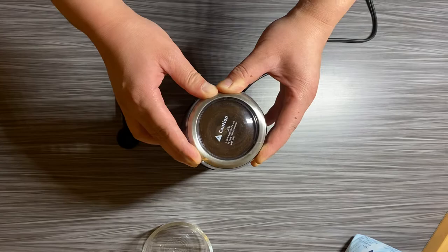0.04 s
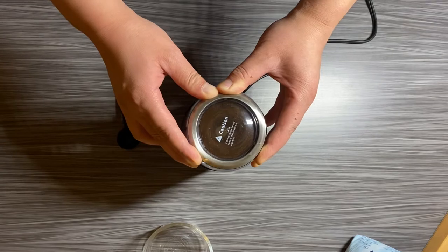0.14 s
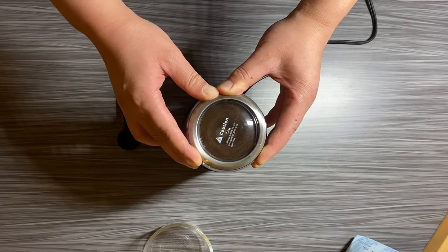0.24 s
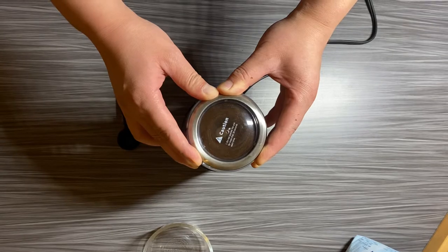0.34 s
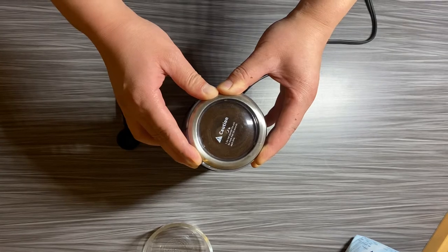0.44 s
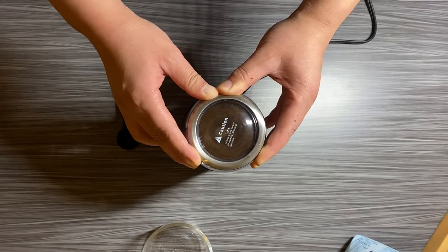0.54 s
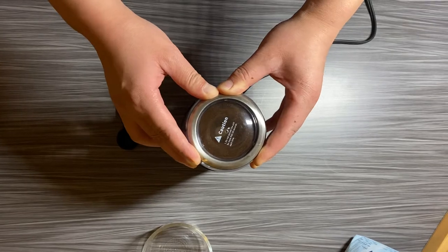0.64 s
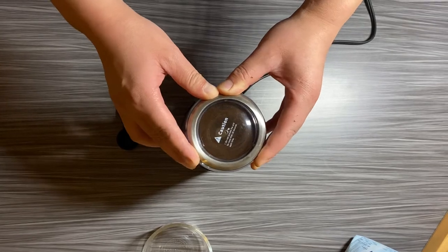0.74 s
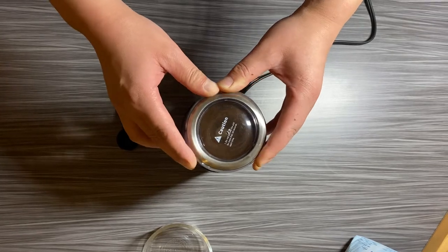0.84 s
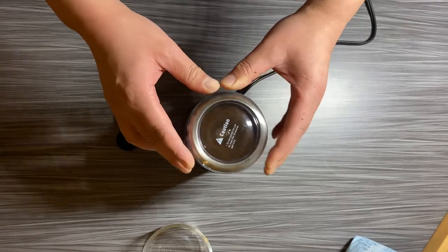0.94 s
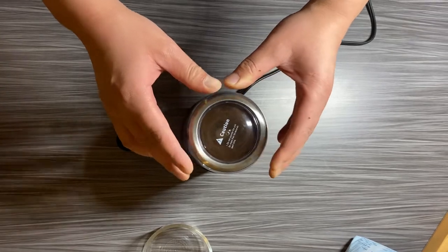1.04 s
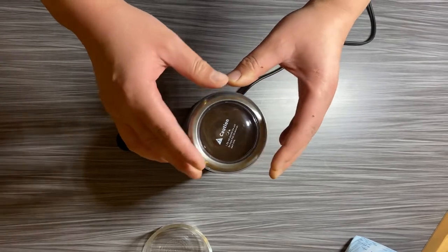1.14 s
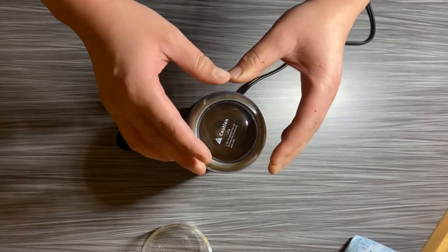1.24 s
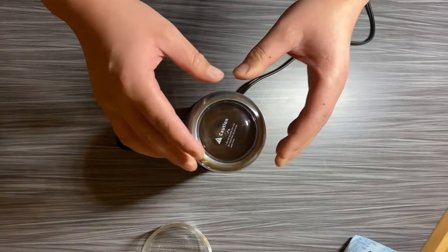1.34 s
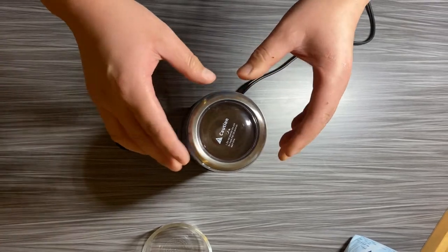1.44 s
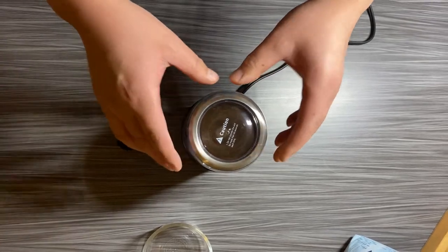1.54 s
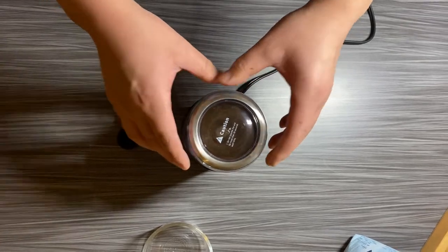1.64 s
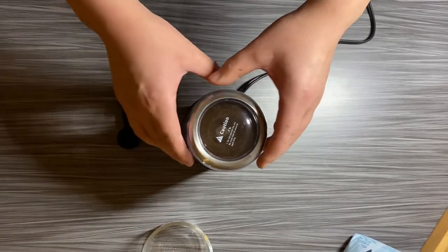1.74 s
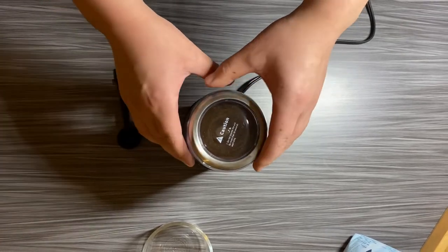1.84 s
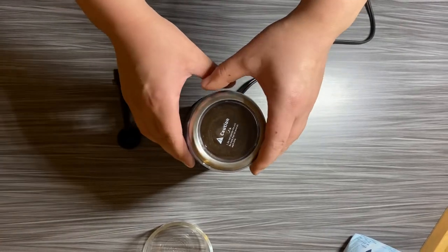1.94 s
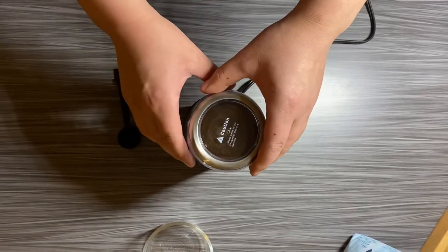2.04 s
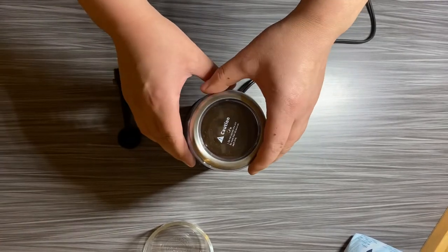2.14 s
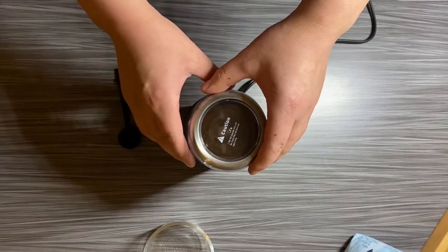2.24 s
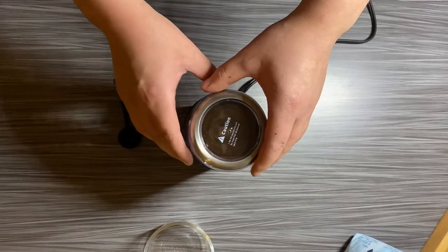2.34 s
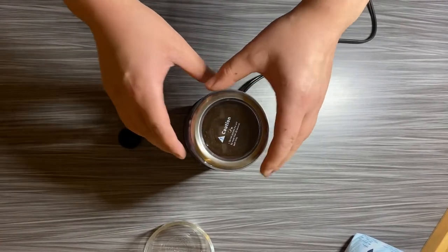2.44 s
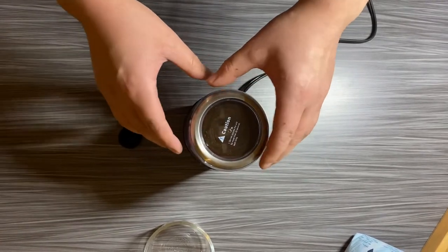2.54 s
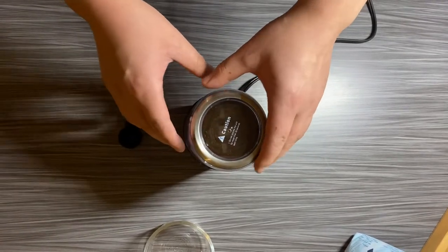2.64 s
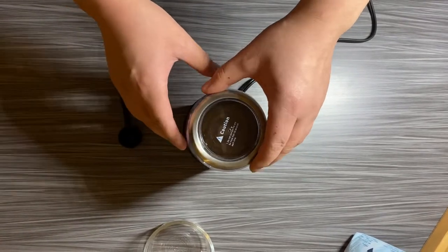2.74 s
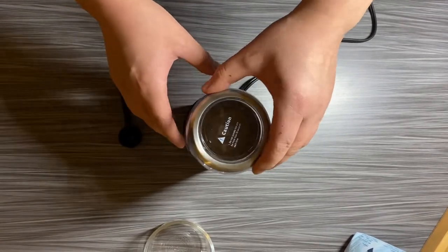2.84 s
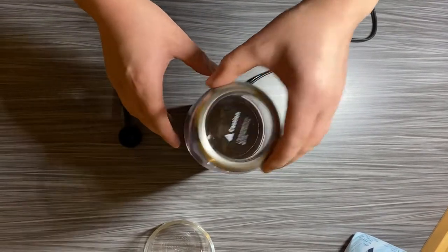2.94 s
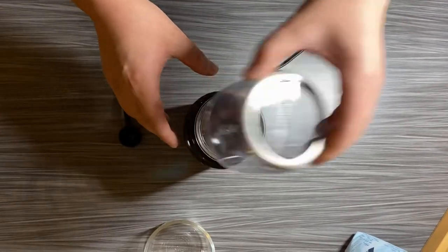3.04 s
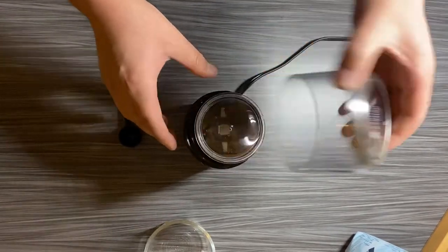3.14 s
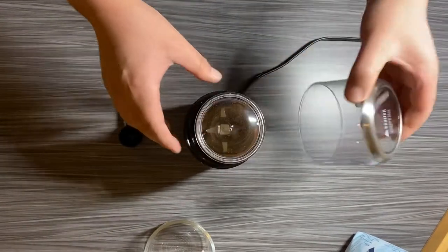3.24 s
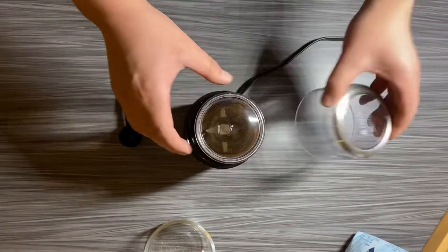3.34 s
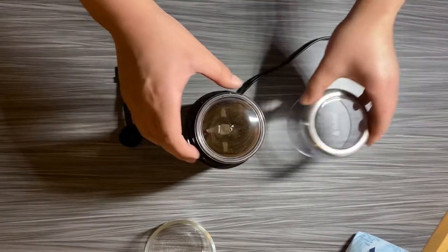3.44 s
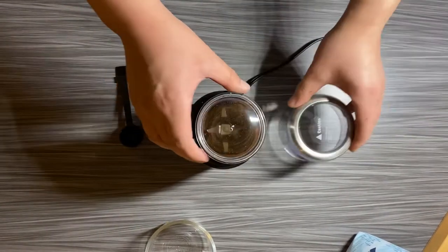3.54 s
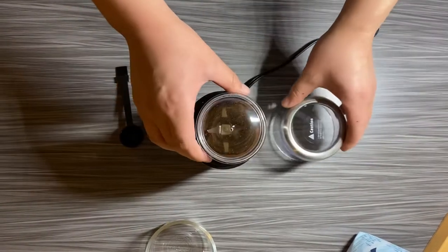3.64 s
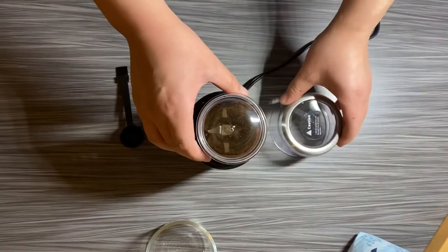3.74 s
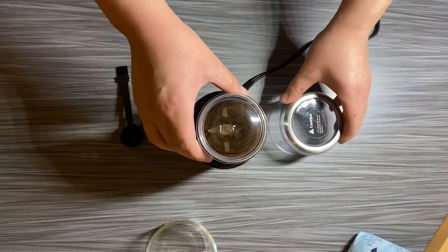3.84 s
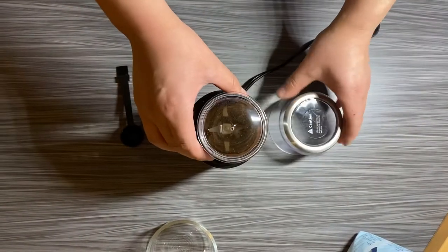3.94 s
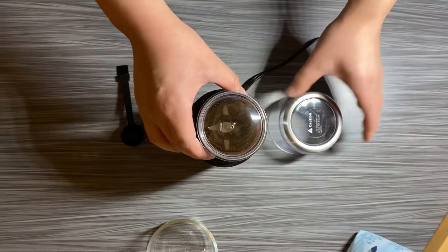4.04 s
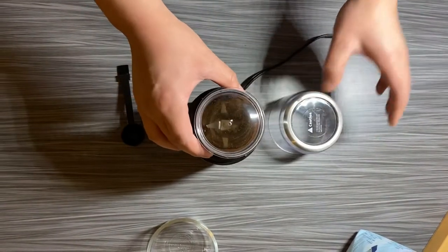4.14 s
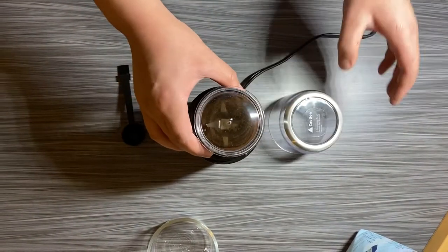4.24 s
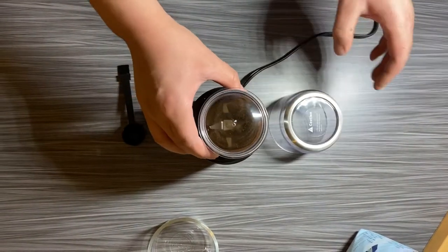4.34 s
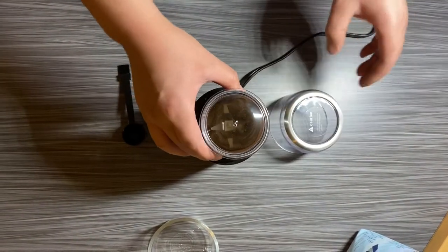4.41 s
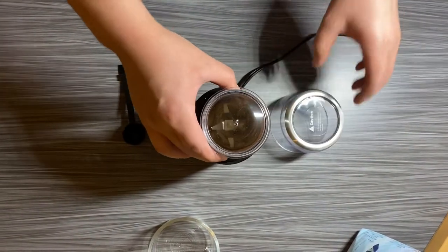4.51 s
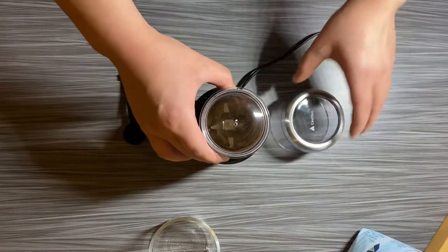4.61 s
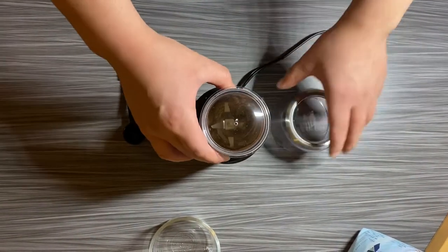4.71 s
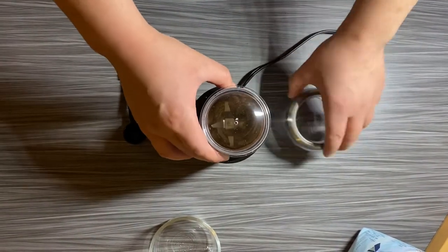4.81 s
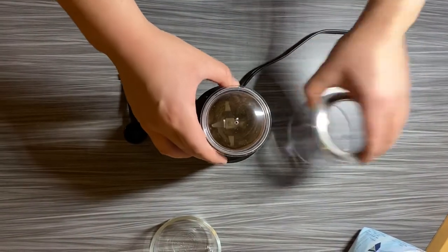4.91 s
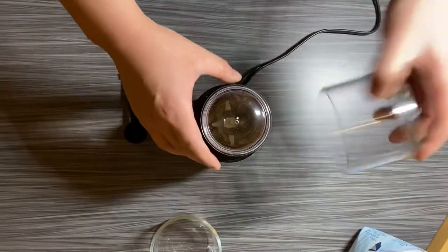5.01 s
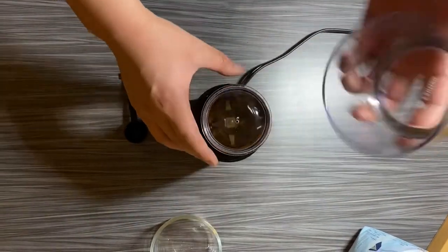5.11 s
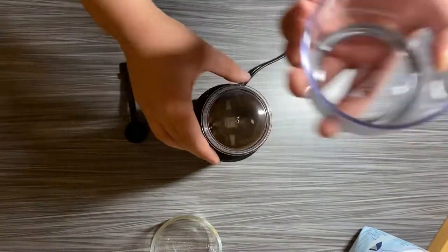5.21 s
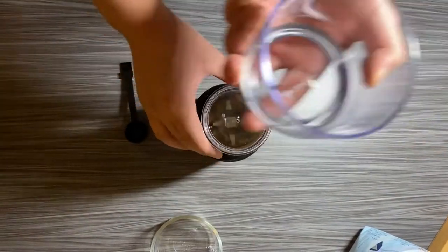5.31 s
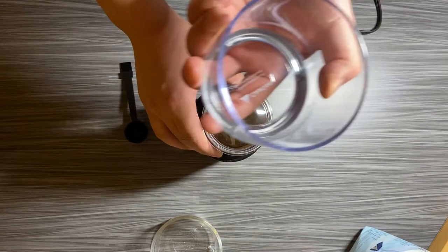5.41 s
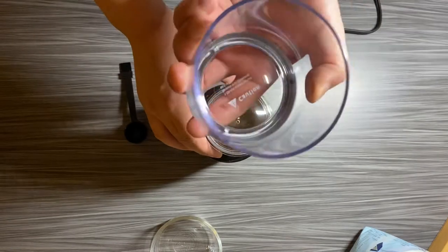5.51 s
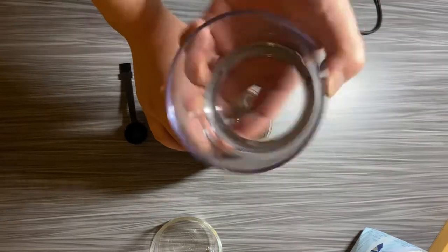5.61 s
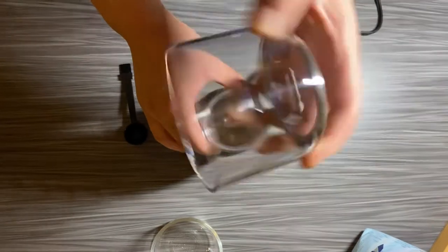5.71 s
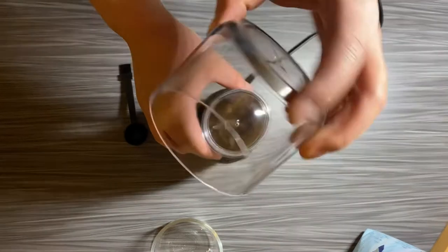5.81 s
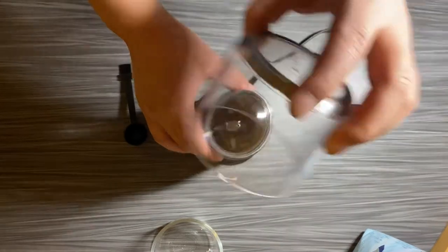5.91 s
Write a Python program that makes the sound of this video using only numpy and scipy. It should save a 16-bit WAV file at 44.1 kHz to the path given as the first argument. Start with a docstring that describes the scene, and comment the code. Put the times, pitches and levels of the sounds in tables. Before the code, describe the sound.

In a small room with a short echo, closely heard in stereo, a blade coffee grinder is already running: a steady nasal whine at about 420 Hz with overtones, a wavering airy howl and churning grounds. At about 0.6 s it is let go; the powered whine and churn cut away quickly and the pitch glides down, while grounds rattle and hiss against the cup in slowing, increasingly separate sweeps until about 2 s. Light ticks follow at 2.0, 2.2 and 2.3 s, then a tight cluster of clicks with a brief scuff at 2.65-2.75 s as the plastic lid comes off. At 3.72 s it lands on the wooden table with the loudest, hollow knock, stronger at right, chattering briefly until 3.8 s, with a small scrape near 3.9 s. Soft finger thuds come at 4.4 and 4.6 s, a thud and juddering slide at 4.78 s, and a faint bump at 5.36 s. Low rumble and faint hiss remain.

```python
"""In a small room, a blade coffee grinder whines on a wooden table, is let go and coasts to a stop.
Its shaft tones follow the speed; grounds excite the resonances of cup and blade as filtered noise.
The plastic lid is pulled off, knocked down on the table and picked up again: blows set decaying modes going.
The room's reflections differ between left and right, over a low rumble and faint hiss."""
import sys
import numpy as np
from scipy import signal
from scipy.fft import rfft, irfft
from scipy.io import wavfile

SR = 44100
rng = np.random.default_rng(int(sys.argv[2]) if len(sys.argv) > 2 else 0)


def master_out(mix):
    """Clip the mix to full scale and print it as 16-bit PCM to the path in sys.argv[1]."""
    frames = np.transpose(np.atleast_2d(mix))
    ceiling = np.clip(frames, -1, 1)
    pcm = np.round(ceiling * 32767).astype(np.int16)
    wavfile.write(sys.argv[1], SR, pcm)


N = 263277
TIME, BINS = np.arange(N) / SR, np.fft.rfftfreq(N, 1 / SR)  # s, Hz

# Spectrum of hard contact ticks. Each row: frequency in Hz, relative level in dB per Hz.
TICK_SPECTRUM = [(200, -5.5), (1000, 8), (2700, -0.5), (4500, 2.5), (5500, -5), (7000, 2), (9000, -8.5),
                 (14500, -18.5)]
# Spectrum of clattering and juddering plastic. Each row: frequency in Hz, relative level in dB per Hz.
CLATTER_SPECTRUM = [(90, -25), (200, -5.5), (420, -8), (820, -0.5), (1100, -5), (1420, -3.5), (2400, -16),
                    (3000, -25), (8000, -43.5)]

RELEASE_S = 0.5877  # the lid is let up and the power goes
RUN_HZ, COAST_S = 421.6, .69  # steady shaft speed, and the moment in s at which it starts to coast
LOAD_S, LOAD_HALF_S = .595, .06  # packed grounds load the blade once: middle and half length
CHURN_FADE_DB_PER_S = 228.5  # shared by the sounds of grounds and air under power


def amp(db):
    """Decibels to gain: 20 dB is a factor of ten in amplitude."""
    return 10 ** (np.asarray(db) / 20)


def unit(x):
    """Normalization: scales to rms 1."""
    return x / np.sqrt(np.mean(x ** 2) + 1e-20)


def read(points, hz):
    """Linear interpolation of a spectrum table on a log-frequency axis."""
    f, value = np.transpose(points)
    return np.interp(np.log(hz + 1), np.log(f + 1), value)


def colour(x, points):
    """Minimum-phase filtering: the ringing follows its cause, and white noise keeps its power."""
    log_gain = np.log(unit(amp(read(points, abs(np.fft.fftfreq(8192, 1 / SR))))))
    minimum_phase = np.exp(np.conj(signal.hilbert(log_gain)))
    taps = np.fft.ifft(minimum_phase).real[:4096]
    return signal.oaconvolve(x, taps)[:N]


def noise():
    """White noise: equal power per Hz."""
    return rng.standard_normal(N)


def drift(hz):
    """Low-passed noise: slow chance up to a rate, at rms 1."""
    return unit(irfft(rfft(noise()) / (1 + (BINS / hz) ** 4), N))


def grains(per_s):
    """Shot noise: tiny clicks at random moments, of random size, at rms 1."""
    return unit(noise() * (rng.random(N) < per_s / SR))


def bump(s, half):
    """Gaussian envelope: a smooth rise and fall, down to 1/e at the half length."""
    return np.exp(-((TIME - s) / half) ** 2)


def fade(db_per_s, start=RELEASE_S):
    """Exponential decay: decibels lost since a moment, by default since the lid was let up."""
    return -db_per_s * np.maximum(TIME - start, 0)


def burst(s, db, decay):
    """Exponential decay of noise that starts at once."""
    envelope = (TIME >= s) * np.exp(-abs(TIME - s) / decay)
    return amp(db) * envelope * noise()


def blow(s, db, contact):
    """Contact pulse of fixed impulse: a longer contact is a duller blow."""
    u = np.clip((TIME - s) / max(contact, 4 / SR), 0, 1)
    push = u * (1 - u)
    return amp(db) * push / np.sum(push)


def ring(blows, modes, in_step=False):
    """Modal synthesis: blows set decaying modes going, with alternating signs or all in step."""
    t = np.arange(SR // 2) / SR
    shape = 0
    for k, (hz, db, t60) in enumerate(modes):
        start = -1j if in_step else (-1) ** k  # in step: every mode starts as a sine
        shape = shape + start * amp(db - 60 * t / t60) * np.exp(2j * np.pi * hz * t)
    return signal.oaconvolve(blows, shape.real)[:N]


def response(hz, modes):
    """Resonance curves summed: complex gain of a set of modes at a frequency."""
    return sum(amp(db) / (1 + 1j * (hz / f - f / (hz + 1e-6)) * f / width) for f, width, db in modes)


def resonate(x, hz, width):
    """Heterodyne resonator: a low-pass shifted to a centre that follows a curve, with gain 1 there."""
    turn = np.exp(2j * np.pi * np.cumsum(hz) / SR)
    r = np.exp(-np.pi * width / SR)
    return 2 * (turn * signal.lfilter([1 - r], [1, -r], x / turn + 1e-18)).real


def background():
    """Stationary filtered noise: a faint hiss, different left and right, under a shared rumble that wanders."""
    # Each row: frequency in Hz, relative level in dB per Hz.
    rumble_spectrum = [(20, -35.5), (54, -6.5), (115, 4), (180, -11.5), (320, -21), (600, -37.5),
                       (1500, -59)]
    # Swells of the rumble. Each row: middle in seconds, half length in seconds, rise in dB.
    rumble_swells = [(2.198, 0.85, 8), (3.356, 0.1, 7.5), (5.303, 0.1, 7.5)]
    air_spectrum = [(60, 3.0), (300, -11.5), (1000, -24.0), (4000, -33.5), (14000, -40.5)]  # Hz, dB per Hz
    swell_db = sum(db * bump(s, half) for s, half, db in rumble_swells)
    rumble = colour(noise(), rumble_spectrum) * amp(-66.5 + swell_db + 1.8 * drift(9.6))
    air = np.array([colour(noise(), air_spectrum) for _ in range(2)])
    return rumble + amp(-69.0) * air


def shaft_speed():
    """Rotor dynamics, in turns per second: steady but for one sag, then slowed by drag and friction."""
    drag_per_s, friction_hz_per_s = .645, 174  # air drag grows with speed, bearing friction does not
    sag_hz = 5.6
    left = np.exp(-drag_per_s * np.maximum(TIME - COAST_S, 0))
    coasting = RUN_HZ * left - friction_hz_per_s / drag_per_s * (1 - left)
    return np.maximum(coasting - sag_hz * bump(LOAD_S, LOAD_HALF_S), .01)


def follow(speed, law):
    """Power law of source level in dB against shaft speed, falling faster once the grounds settle."""
    settle_hz = 108.4  # below this speed the grounds drop out of the whirl
    full_db, power, settle_db = law
    settling = np.maximum(1 - speed / settle_hz, 0)
    return full_db + power * 20 * np.log10(speed / RUN_HZ) - settle_db * settling


def motor(speed, turns):
    """Tones locked to rotation: shaft multiples and blade pass, with mains hum and the housing's wobble."""
    # Each row: multiple of the shaft speed, relative level in dB, start of the fade in seconds.
    whine_tones = [(1, 2.5, .64), (3, -3.5, .59), (4, -6.5, .72), (5, -8, .59), (6.38, -16.5, 0.54),
                   (8.33, -25, 0.39)]
    whine_db, waver_db, whine_fade_db_per_s = -26.2, 1.7, 170
    blade_pass_db, load_swell_db = -35.5, 18.5
    mains_hz, mains_db, mains_fade_db_per_s = 122, -40.5, 501.5
    # one shaft tone swells briefly as the drive is lost
    jolt_multiple, jolt_db = 4, 6 * bump(COAST_S, .045)
    shaken = turns + .003 * drift(20)  # phase in turns, shaken by the load
    whine = 0
    for k, db, end in whine_tones:
        tone_db = whine_db + db + waver_db * drift(13) + fade(whine_fade_db_per_s, end)
        tone_db = tone_db + jolt_db * (k == jolt_multiple)
        whine = whine + amp(tone_db) * np.cos(2 * np.pi * (k * shaken + rng.random()))
    blade_db = blade_pass_db + load_swell_db * bump(LOAD_S, LOAD_HALF_S) + fade(CHURN_FADE_DB_PER_S, LOAD_S)
    blade = amp(blade_db) * unit(np.sin(2 * np.pi * 2 * shaken))  # two tips pass in each turn
    mains_level = amp(mains_db + fade(mains_fade_db_per_s) + 2 * drift(5.3))
    mains = mains_level * np.sin(2 * np.pi * mains_hz * TIME)
    return whine + blade + mains + wobble(speed, turns)


def swirl():
    """Cavity resonance: the air in the cup howls, its modes shifting with the whirling cloud of grounds."""
    # Each row: time in seconds, pitch in Hz, level in dB.
    howl_path = [(0, 1442, -35), (.15, 1442, -34.5), (0.281, 1460, -33), (.39, 1404, -34.5),
                 (0.482, 1445, -28.5), (.55, 1400, -37.5), (0.601, 1360, -34)]
    # Air modes that move together. Each row: multiple of that pitch, relative level in dB.
    air_modes = [(.695, -6.5), (1, 1), (1.84, -16)]
    width_hz = 45  # of each of two resonators in series
    s, hz, db = np.transpose(howl_path)
    pitch, howl = np.interp(TIME, s, hz), 0
    for multiple, mode_db in air_modes:
        once = resonate(noise(), multiple * pitch, width_hz)
        twice = resonate(once, multiple * pitch, width_hz)
        howl = howl + amp(mode_db) * unit(twice)
    return howl * amp(np.interp(TIME, s, db) + fade(CHURN_FADE_DB_PER_S))


def grounds(speed, turns):
    """Granular excitation: flung grounds ring cup and blade once a turn; slowing, the sweeps come apart."""
    # Cup struck by the grounds. Each row: frequency in Hz, width in Hz, relative level in dB.
    cup_modes = [(314, 66, 7), (530, 280, -8.5), (669, 50, -5), (1371.5, 62, -3), (1635, 120, -0.5),
                 (2037, 63, -9), (2635, 68, -8), (4012, 92, -13), (4560, 290, -20)]
    # Steel blade, its response applied twice. Each row: frequency in Hz, width in Hz, level in dB, per pass.
    blade_modes = [(3080, 220, 0)]
    # Clumps falling into the blade. Each row: middle and half length in seconds, rattle and hiss rise in dB.
    clumps = [(0.498, 0.025, 1.5, 1.5), (0.715, 0.092, 5.5, 2), (0.849, 0.014, 5.5, 6.5),
              (0.962, 0.12, 5.5, 6), (1.42, 0.19, 5, 4.5), (1.797, 0.12, 7, 5), (1.985, 0.075, 2.5, -5)]
    # Spectra of hiss and churn. Each row: frequency in Hz, relative level in dB per Hz.
    hiss_spectrum, churn_spectrum = [(300, -23), (2000, -2.5), (3600, -7.5), (4700, -5.5), (7000, -3.5),
                                     (9000, 1.5), (13400, -8), (14500, -5)], [(50, -42), (115, -4), (200, -25.5), (355, 4),
                                                   (480, -15.5), (610, -5.5), (780, -21), (1020, -2.5),
                                                   (1150, -12.5), (1400, -5), (1650, -18.5), (2700, -15.5),
                                                   (3400, -22.5), (8000, -36.5)]
    # Each: level in dB at full speed, power of the speed, dB lost as the grounds settle.
    rattle_law, hiss_law = (-37.5, 1.076, 9.7), (-35, 1.4, 33)
    wall_rattle_db = -7  # under power the grounds ride the wall and rattle less
    blade_ring_db, blade_damped_db = -11.5, -17.5  # driven through the grounds, the blade is damped
    churn_db, chips_db, chips_per_s = -29, -42, 70

    clump_db, clump_hiss_db = sum(np.outer(db, bump(s, half)) for s, half, *db in clumps)
    powered = np.clip(1 - (TIME - RELEASE_S) / 0.036, 0, 1)
    rattle_db = follow(speed, rattle_law) + clump_db + wall_rattle_db * powered

    # each turn has its own chance strength
    sweep_size = amp(2.0 * np.clip(rng.standard_normal(N), -1.5, 1.5))[turns.astype(int)]
    sweeps = sweep_size * np.exp(-(turns % 1) / 0.42)
    apart = .5 / (1 + speed / 600)
    moving = speed > 18  # below this speed in Hz the grounds lie still
    flow = np.sqrt(1 - apart + apart * 7 * sweeps ** 2) * moving
    knocks = np.diff(np.floor(turns), prepend=0) * sweep_size * np.sqrt(SR / (speed + 60))
    strikes = flow * noise() + .5 * knocks * moving

    detune = 1 + .008 * drift(7.7)  # the shifting grounds detune the cup
    cup = sum(amp(db) * resonate(strikes, hz * detune, width) for hz, width, db in cup_modes)
    rattle = unit(cup) * amp(rattle_db)
    blade_db = rattle_db + blade_ring_db + blade_damped_db * powered + 3 * drift(15)  # its ring flutters
    blade = unit(irfft(rfft(strikes) * response(BINS, blade_modes) ** 2, N)) * amp(blade_db)

    hiss = colour(flow * noise() * amp(2.8 * drift(190)), hiss_spectrum)
    hiss = hiss * amp(follow(speed, hiss_law) + clump_hiss_db)
    churn = colour(flow * noise() * amp(2 * drift(97)), churn_spectrum)
    churn = churn * amp(churn_db + clump_db + fade(CHURN_FADE_DB_PER_S))
    # coarse chips of bean tick against the cup under power
    chips = colour(grains(chips_per_s), TICK_SPECTRUM) * amp(chips_db + fade(CHURN_FADE_DB_PER_S))
    return rattle + blade + hiss + churn + chips


def wobble(speed, turns):
    """Swept resonance: the freed shaft's tones glide down, each swelling as it crosses a housing mode."""
    # Housing shaken by the shaft, gain raised to the power 1.5 below.
    # Each row: frequency in Hz, width in Hz, level in dB, before that power.
    housing_modes = [(300, 30, 0), (351, 26, -2), (522, 40, -6)]
    # Level in dB at full speed, power of the speed, dB lost as the grounds settle.
    wobble_law = (-23.5, .6, 12)
    overtone_db = -21  # part of each overtone that bypasses the housing modes, before division by k
    # a slow blade is jostled more by the grounds
    jostled = turns + (.015 + .15 * np.clip(1 - speed / 260, 0, 1)) * drift(28)
    tones = 0
    for k in range(1, 7):
        boost = response(k * speed, housing_modes)
        direct = amp(overtone_db + 3 * drift(25)) * (k > 1)
        gain = (boost * np.sqrt(abs(boost)) + direct) / k
        tones = tones + (gain * np.exp(2j * np.pi * (k * jostled + rng.random()))).real
    freed = np.clip((TIME - RELEASE_S) / (COAST_S - RELEASE_S), 0, 1)
    return freed * amp(follow(speed, wobble_law) + 2 * drift(25)) * tones


def grinder_taps():
    """Impact on modes: the last grains and the lid's catch tick against the body and the seated lid."""
    # Grinder body, then the lid while it sits on the cup.
    # Each row: frequency in Hz, relative level in dB, 60 dB decay time in seconds.
    body_modes, seated_lid_modes = [(295, 15, 0.064), (342, 0.5, 0.12), (588, -6.5, 0.17),
                                    (1010, -4.5, 0.11), (1750, 5, 0.12), (1904, -9, 0.087),
                                    (2677, -11, 0.14), (3530, -12, 0.13), (4520, -7, 0.13)], [(1380, 4, 0.072)]
    # Each row: start in seconds, body blow in dB, contact time in seconds,
    # tick level in dB, tick decay in seconds, lid blow in dB.
    body_taps = [(2.037, -61.5, 0.00067, -61.5, 0.0091, -79), (2.184, -74, 0.00064, -65.5, 0.0046, -71),
                 (2.328, -54, 0.00145, -71, 0.0046, -69), (2.659, -55, 0.0017, -65, 0.0049, -71),
                 (2.674, -61, 0.00043, -62.5, 0.0071, -81), (2.714, -65, 0.00012, -53.5, 0.009, -83),
                 (2.727, -53, 0.000089, -52, 0.007, -82), (2.738, -47.5, 0.0015, -51, 0.0059, -79)]
    blows = sum(blow(s, db, contact) for s, db, contact, *_ in body_taps)
    ticks = sum(burst(s, db, decay) for s, _, _, db, decay, _ in body_taps)
    on_lid = sum(blow(s, db, contact=.00015) for s, *_, db in body_taps)
    return ring(blows, body_modes) + ring(on_lid, seated_lid_modes) + colour(ticks, TICK_SPECTRUM)


def hands():
    """Soft impact and stick-slip: fingers thud and brush; the sliding lid's rim hisses and judders."""
    # Fingers letting go and gripping again.
    # Each row: start in seconds, thud in dB, thud decay in seconds, brush in dB.
    thumps = [(4.368, -56.5, 0.031, -75.5), (4.39, -49, 0.021, -86), (4.407, -55.5, 0.013, -75.5),
              (4.61, -50.5, 0.022, -72), (4.742, -65, 0.027, -69), (4.779, -49.5, 0.034, -80),
              (5.357, -58.5, 0.016, -83)]
    # Lid sliding off the cup and over the table.
    # Each row: middle in seconds, half length in seconds, hiss in dB, judder in dB.
    slides = [(2.724, 0.0078, -49.5, -79), (3.918, 0.022, -64, -47), (4.767, 0.015, -58, -56.5),
              (4.781, 0.0029, -82.5, -43.5), (4.789, 0.0023, -77, -46), (4.798, 0.0093, -76, -48)]
    # Spectra of thuds and of sliding plastic. Each row: frequency in Hz, relative level in dB per Hz.
    thud_spectrum, scuff_spectrum = [(60, -18.5), (135, 9), (200, 2.5), (430, -0.5), (650, -18),
                                     (1000, -41), (3000, -44)], [(500, 6), (3500, 0.5), (7000, 15.5), (14000, 4.5)]
    slips_per_s = 1500  # sliding plastic catches and slips
    thuds = sum(burst(s, db, decay) for s, db, decay, _ in thumps)
    brushes = sum(burst(s, db, decay=0.014) for s, *_, db in thumps)
    hiss_level, judder_level = sum(np.outer(amp(db), bump(s, half)) for s, half, *db in slides)
    scuff = hiss_level * (noise() + grains(slips_per_s)) / np.sqrt(2)
    # slips are softer than blows
    judder = signal.lfilter(*signal.butter(3, 1900, fs=SR), judder_level * grains(slips_per_s))
    fingers = colour(thuds, thud_spectrum) + colour(brushes, TICK_SPECTRUM)
    return fingers + colour(scuff, scuff_spectrum) + colour(judder, CLATTER_SPECTRUM)


def lid():
    """Impact on modes: the rim knocks the table top, rings and chatters as it settles."""
    # Table top under the lid, then the free lid.
    # Each row: frequency in Hz, relative level in dB, 60 dB decay time in seconds.
    table_modes, lid_modes = [(128, -15, 0.22), (305, 0, 0.06), (490, 6, 0.065), (570, 5, 0.06),
                              (634, 7, 0.065)], [(1275, -10, 0.0689), (1394, 0.5, 0.1), (1450, -2, 0.085),
                                                   (1575, -15.5, 0.077), (2040, -12.5, 0.09),
                                                   (2477, -13, 0.05), (6200, -21, 0.06)]
    # Each row: start in seconds, table blow in dB, lid blow in dB, tick in dB, clatter in dB.
    lid_hits = [(3.7202, -16.5, -19.5, -23, -17), (3.736, -28, -39, -39, -20),
                (3.752, -46, -38, -50, -31.5), (3.8, -65, -29, -47, -30), (3.906, -49, -44.5, -65, -51),
                (3.935, -50.5, -52.5, -66, -49)]
    knocks = sum(blow(s, db, contact=.0007) for s, db, *_ in lid_hits)
    blows = sum(blow(s, db, contact=.00022) for s, _, db, *_ in lid_hits)
    ticks = sum(burst(s, db, decay=0.0028) for s, *_, db, _ in lid_hits)
    clatter = sum(burst(s, db, decay=.009) for s, *_, db in lid_hits)
    rings = ring(knocks, table_modes) + ring(blows, lid_modes, in_step=True)
    return rings + colour(ticks, TICK_SPECTRUM) + colour(clatter, CLATTER_SPECTRUM)


def room(x, wet_db, early_db):
    """Reverberation: direct sound, near reflections and a diffuse tail, different left and right."""
    # Each row: frequency in Hz, 60 dB decay time in seconds.
    decay_times = [(100, 0.25), (400, 0.37), (1500, 0.37), (5000, 0.31), (13000, 0.24)]
    size = int(SR * .7)
    hz, t, z = signal.stft(rng.standard_normal((2, size)), SR, nperseg=256)
    decay = amp(-60 * t / read(decay_times, hz)[:, None])
    onset = np.minimum(t / .012, 1)
    tail = signal.istft(z * decay * onset, SR, nperseg=256)[1]
    t = np.arange(tail.shape[1]) / SR
    early = rng.standard_normal(len(t)) * t * np.exp(-t / 0.0012)
    early = signal.lfilter(*signal.butter(2, 500, "high", fs=SR), early)
    shared, apart = amp(wet_db) * tail / np.linalg.norm(tail[0])
    apart = apart + amp(early_db) * early / np.linalg.norm(early)
    # the echoes differ between left and right mainly in the middle range
    apart = signal.lfilter(*signal.butter(3, [380, 5200], "band", fs=SR), apart)
    echoes = np.array([shared + apart, shared - apart])
    return x + signal.oaconvolve(x[None], echoes, axes=1)[:, :N]


def scene():
    """Superposition: grinder, lid and hands, each with its room sound, over the background."""
    speed = shaft_speed()
    turns = np.cumsum(speed) / SR
    drive = room(motor(speed, turns) + swirl(), wet_db=-25, early_db=-15)
    cup = room(grounds(speed, turns), wet_db=-9.5, early_db=-10)
    touches = room(grinder_taps() + hands(), wet_db=-11.0, early_db=-4.5)
    knock = room(lid(), wet_db=-10, early_db=-5) * amp([[-.7], [.7]])  # dB: the right is louder
    return drive + cup + touches + knock + background()


def record(dry):
    """Stereo colouring: a chosen phase difference between left and right widens the treble; then a low-pass."""
    # Each row: frequency in Hz, chosen phase difference between left and right in radians.
    stereo_phase = [(60, 0), (550, -.2), (830, -2.1), (1000, -.5), (1300, .4), (3100, -.8), (3900, -.2),
                    (5000, -1.5), (5700, -.3), (6800, 0), (7400, 1.6), (8500, 3.1), (9600, 3.2),
                    (11300, 6.2), (13000, 6.4), (14200, 9.3)]
    cutoff_hz = 14700
    half_turn = np.exp(.5j * read(stereo_phase, np.fft.rfftfreq(1024, 1 / SR)))
    taps = np.fft.fftshift(irfft(np.array([half_turn, np.conj(half_turn)])), axes=1)
    stereo = signal.oaconvolve(dry, taps[:, 1:], "same", axes=1)
    low_pass = signal.firwin(401, cutoff_hz, window=("kaiser", 9), fs=SR)
    return signal.oaconvolve(stereo, low_pass[None], "same")


dry = scene()
out = record(dry)
master_out(out)
```